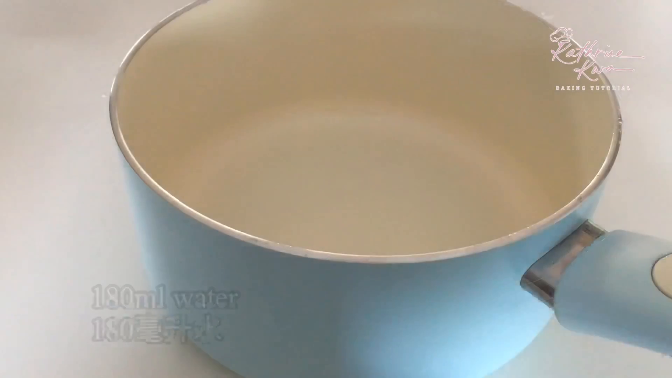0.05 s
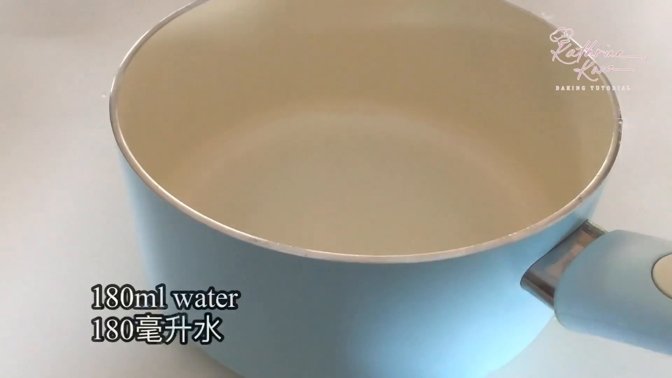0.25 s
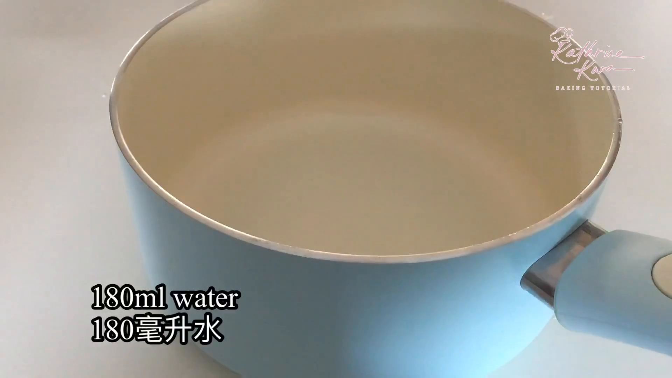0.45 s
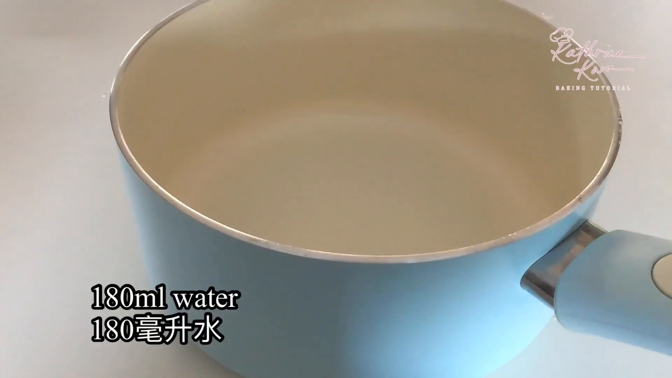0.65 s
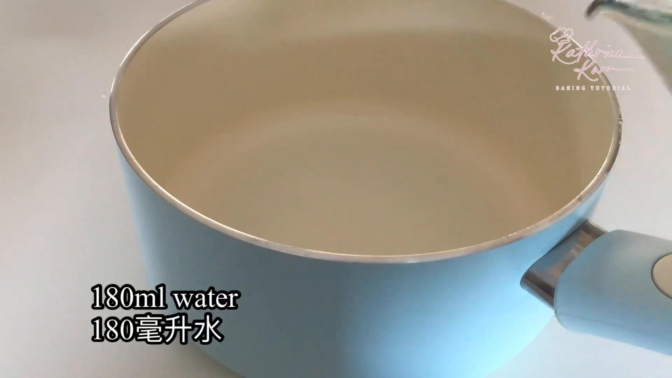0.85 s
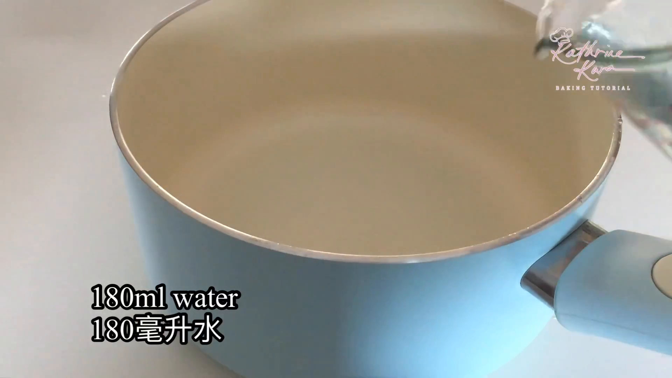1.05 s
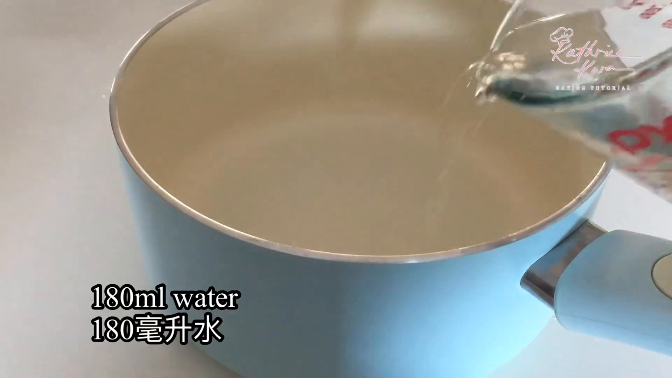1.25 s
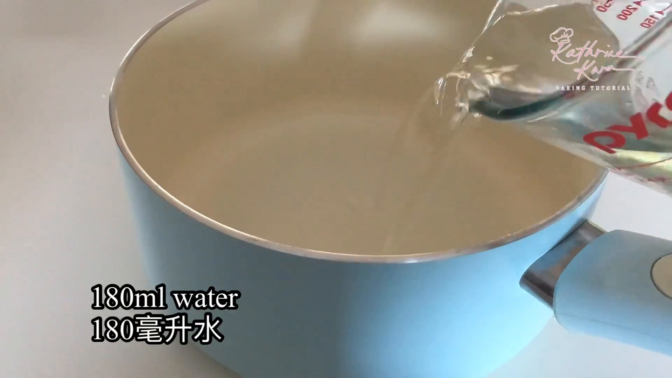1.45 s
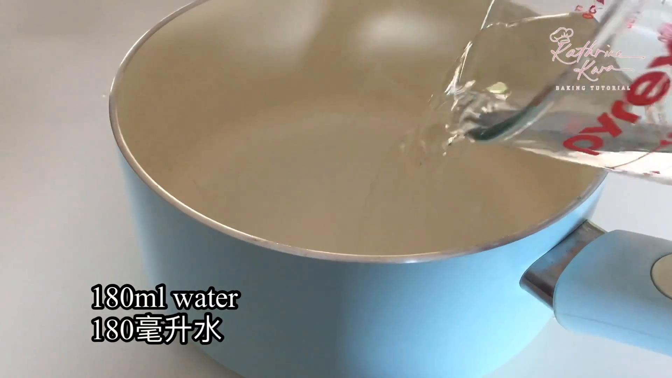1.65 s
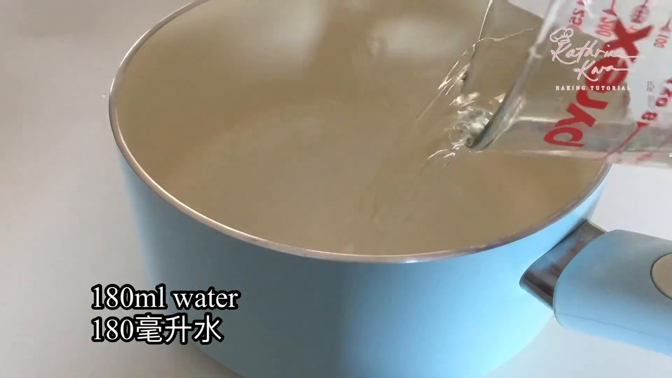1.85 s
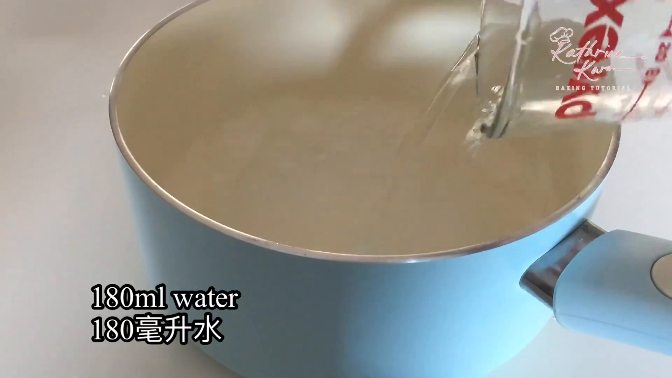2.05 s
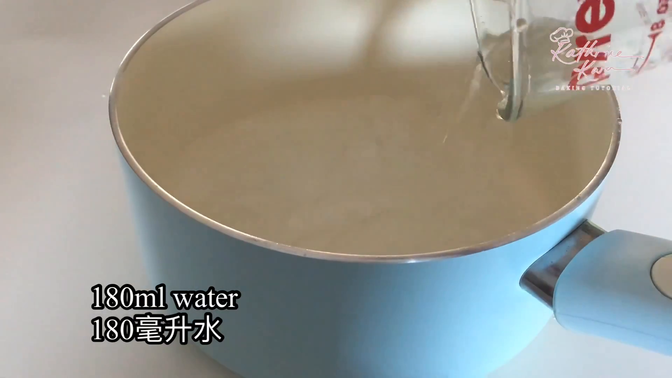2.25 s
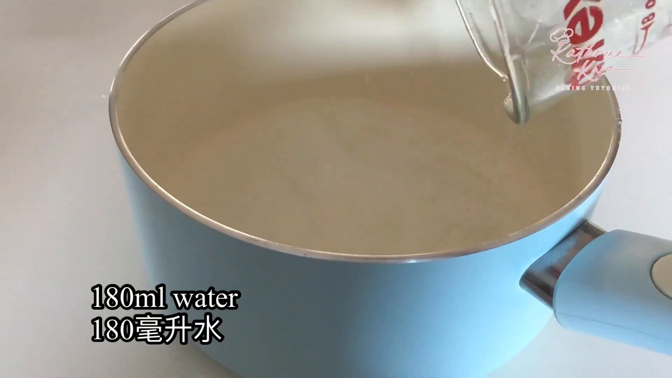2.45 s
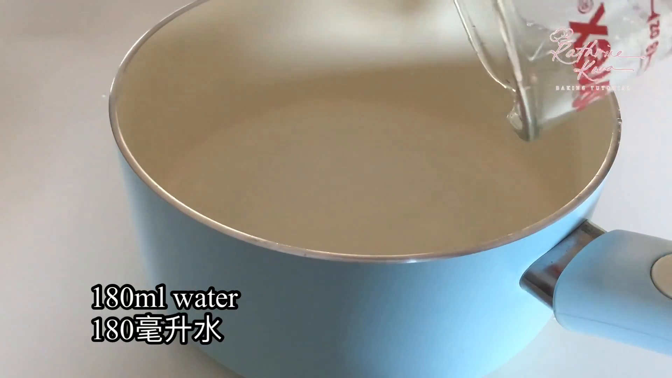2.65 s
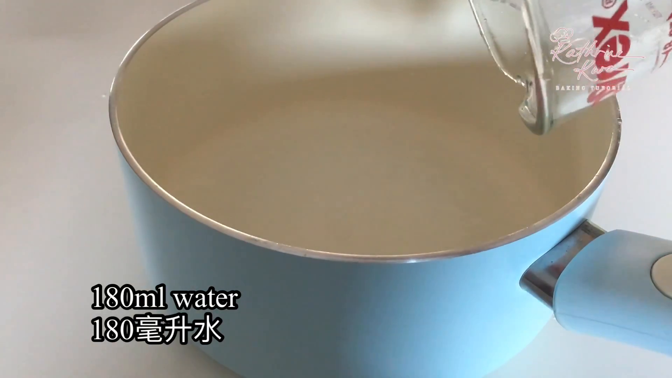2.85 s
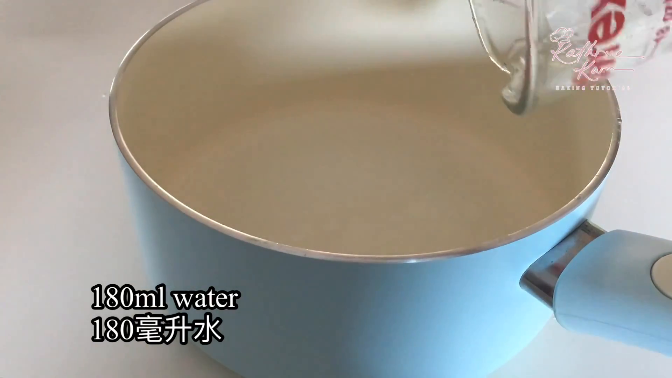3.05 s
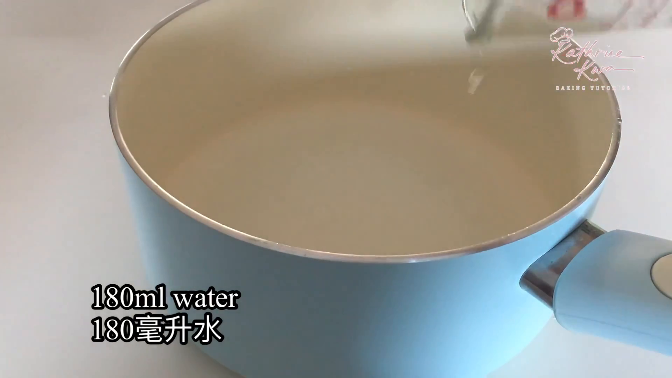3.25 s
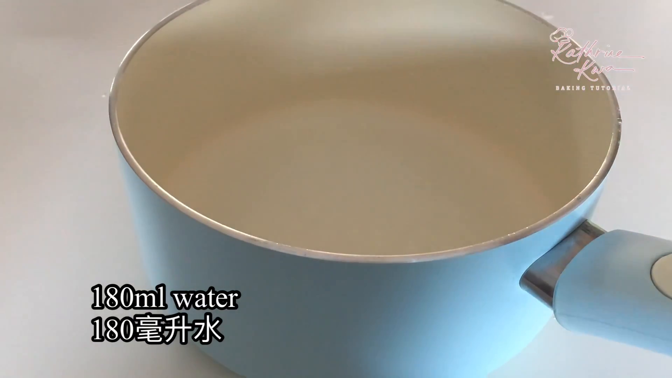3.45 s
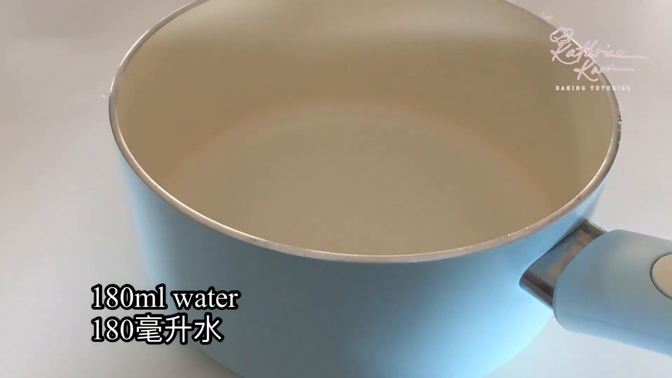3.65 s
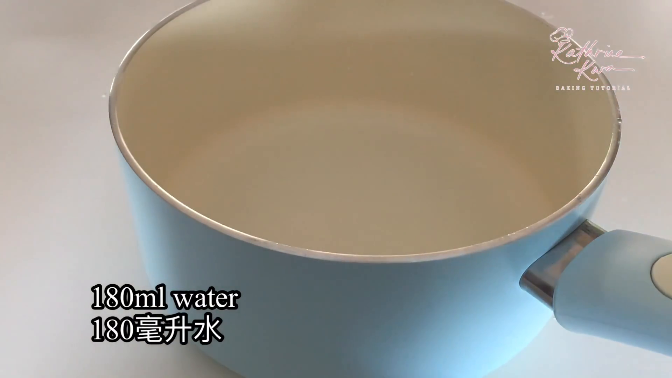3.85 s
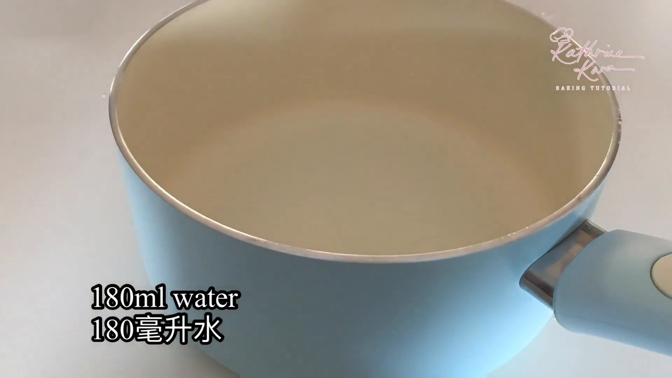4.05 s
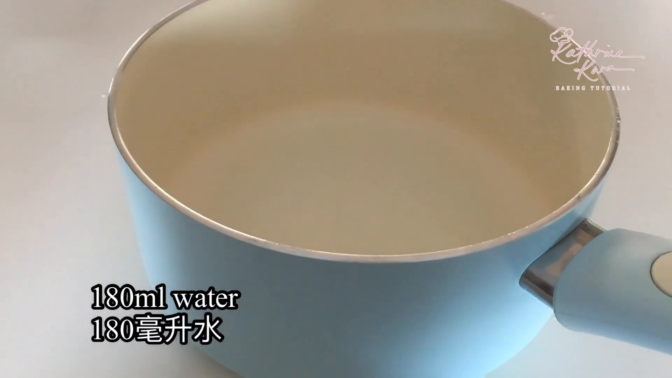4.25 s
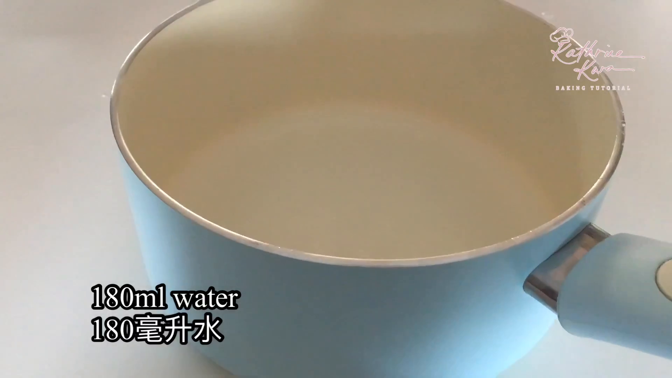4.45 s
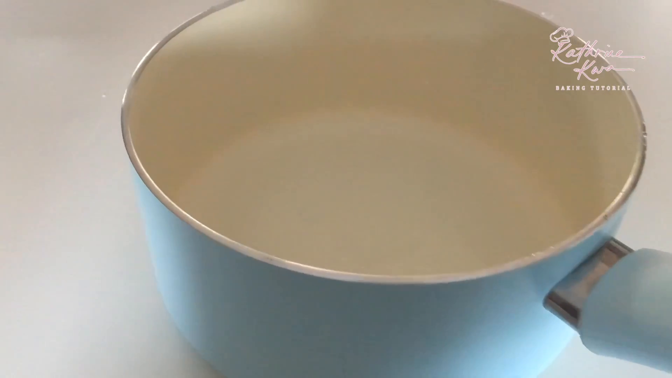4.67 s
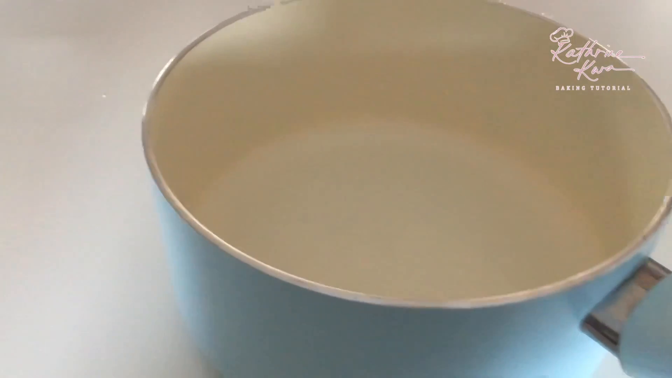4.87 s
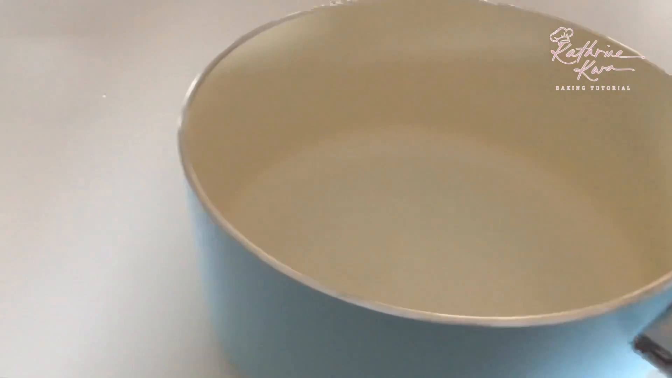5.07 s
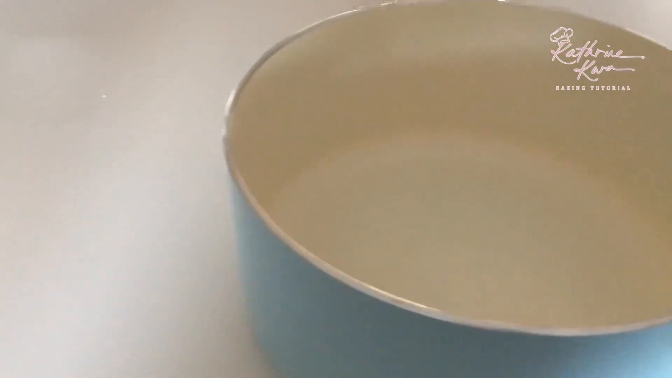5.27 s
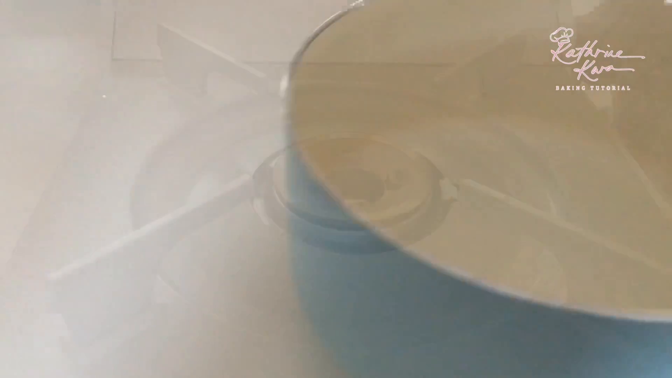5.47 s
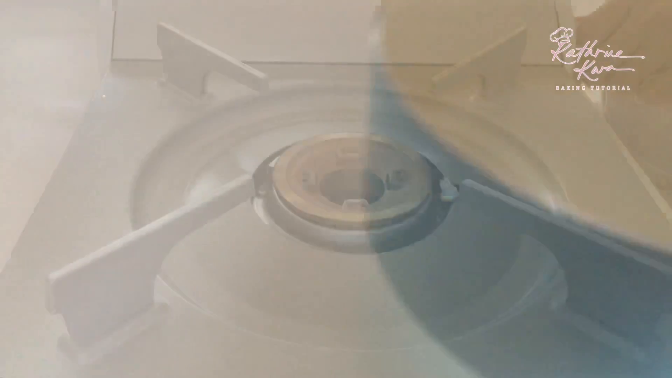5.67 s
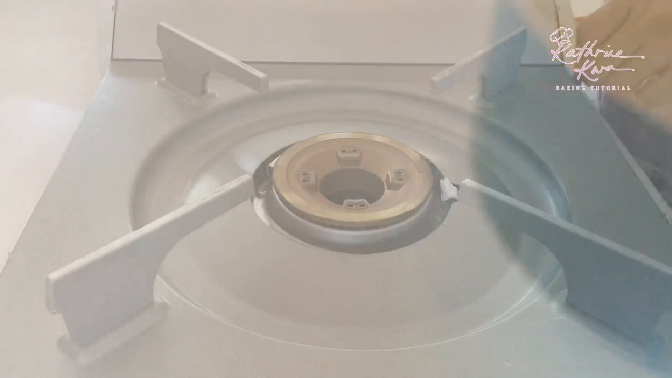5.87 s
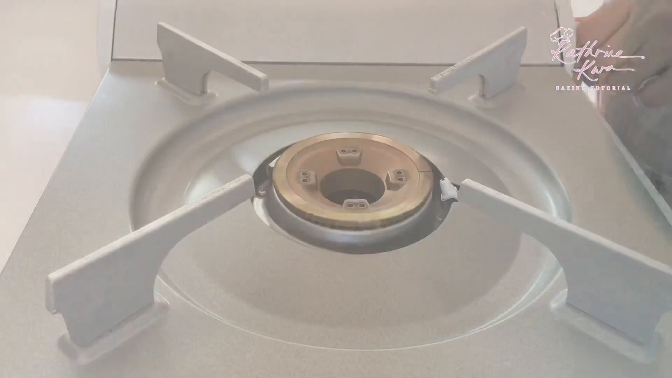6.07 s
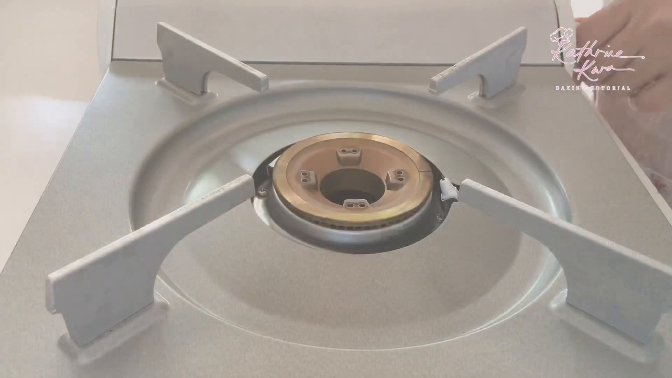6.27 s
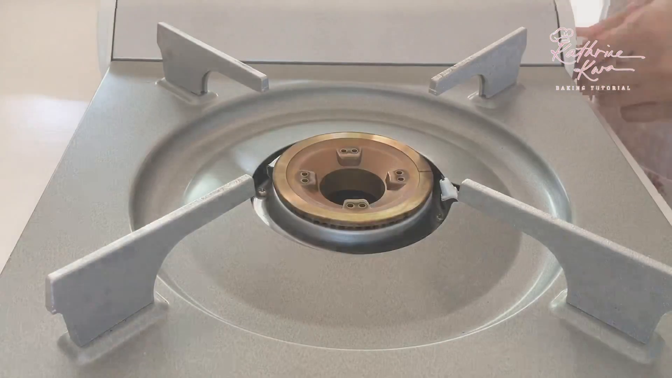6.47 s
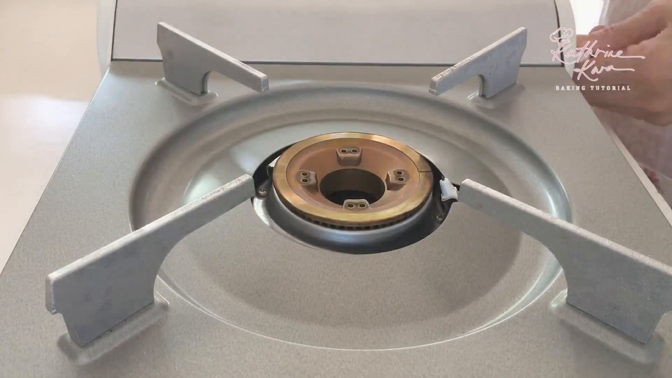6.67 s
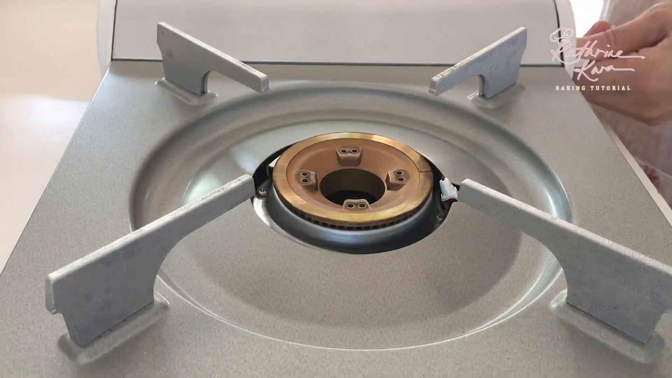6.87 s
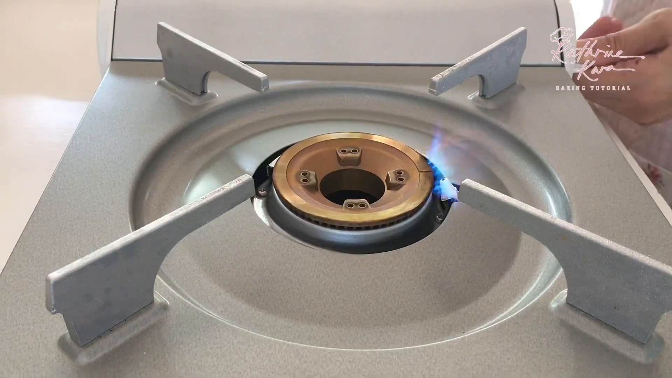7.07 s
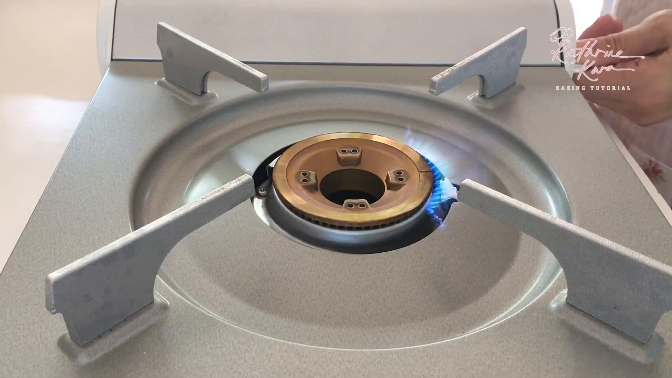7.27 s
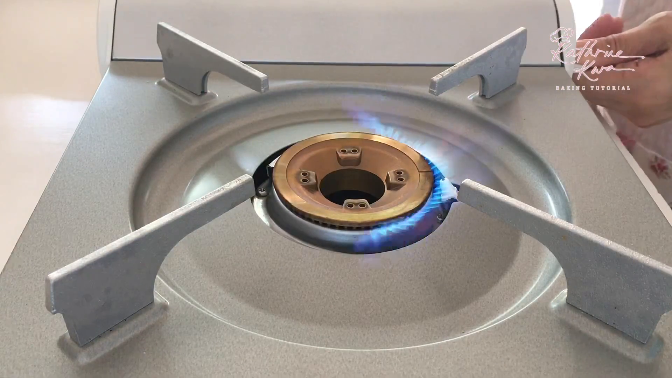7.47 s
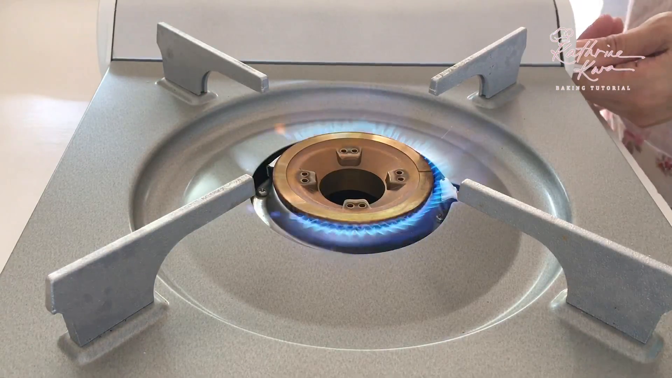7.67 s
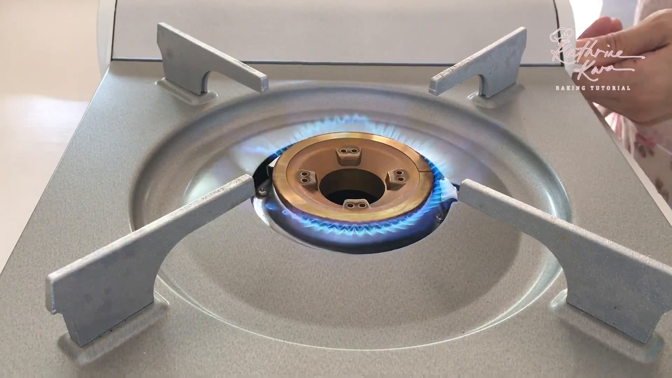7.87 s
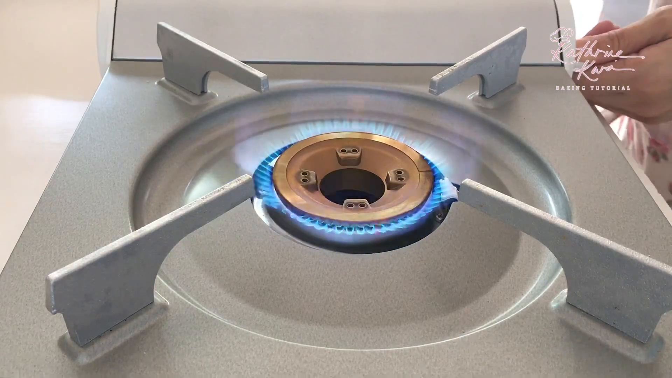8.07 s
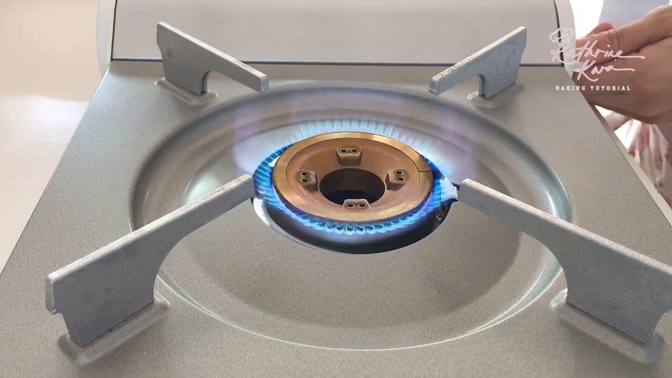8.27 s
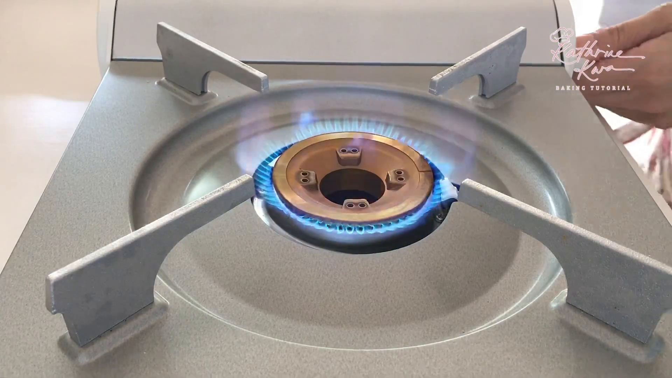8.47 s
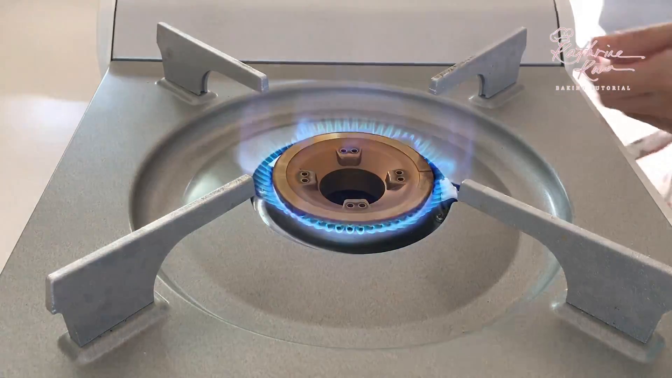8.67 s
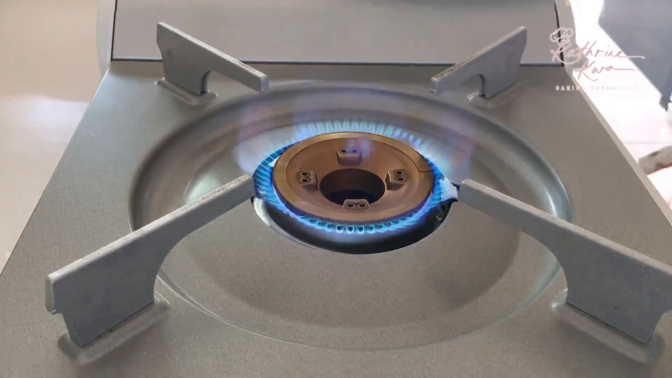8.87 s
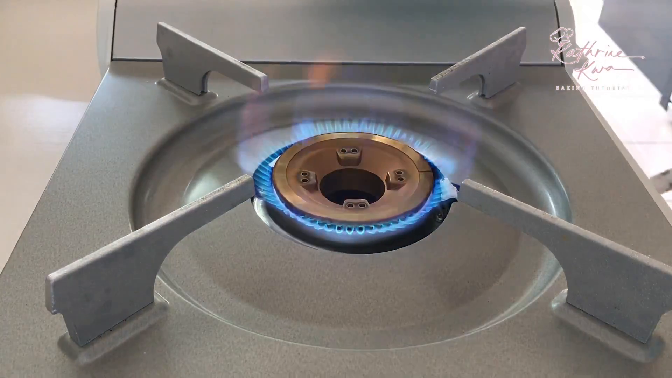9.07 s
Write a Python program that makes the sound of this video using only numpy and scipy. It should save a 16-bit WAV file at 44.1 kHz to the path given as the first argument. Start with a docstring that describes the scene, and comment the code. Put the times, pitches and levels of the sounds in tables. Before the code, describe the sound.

Faint handling squeaks over low room hum, then one dull, briefly ringing knock of glass on a pan. Water patters and gurgles in for under a second, leaving tiny high drips. Two pushes follow: a resonant scrape and a smoother hissing slide. Finally a knob turns, thin gas hiss begins, the igniter cracks loudly once, and a burner burns with soft low puffs. Close-miked, lightly reverberant kitchen.

```python
"""A quiet, humming kitchen: faint squeaks, then a glass jug knocks on a saucepan, and the pan's modes ring.
Water pours in as a swarm of ringing bubbles with a fine splash, and the jug drips dry.
The pan is pushed twice over the counter: a rubbing, ringing scrape, then a smooth, hissing glide.
A hand turns a stove's knob: gas hisses through the resonant burner tube and the piezo igniter snaps once.
The flame spreads round the burner as fluttering noise, with flares, fine crackle and soft pops of gas."""
import sys
import numpy as np
from scipy import signal
from scipy.fft import rfft, irfft, next_fast_len
from scipy.io import wavfile
from scipy.ndimage import uniform_filter1d, map_coordinates

SR = 44100
rng = np.random.default_rng(int(sys.argv[2]) if len(sys.argv) > 2 else 0)


def bounce(signal):
    """Save signal as a 16-bit WAV file at the path given by the first command-line argument."""
    frames = np.transpose(np.atleast_2d(signal))
    limited = np.clip(frames, -1, 1)
    pcm = np.round(limited * 32767).astype(np.int16)
    wavfile.write(sys.argv[1], SR, pcm)


N = 402092

# Spectrum of the room noise. Each row: frequency in Hz, relative density in dB per Hz.
AIR_SPECTRUM = [(15, -54), (25, -15.5), (87, -2.5), (130, -9), (161, -4), (223, -10), (363, -10),
                (503, -20), (560, -18), (796, -22), (2160, -28.5), (2990, -36), (3340, -36), (4140, -36),
                (16000, -53)]
# Partials of an appliance's hum. Each row: frequency in Hz, relative level in dB.
HUM_PARTIALS = [(102.3, -53.5), (161.5, -53.5), (199.2, -58), (355.3, -65.5), (538.3, -66), (570.6, -64)]
# Reverberation of the kitchen. Each row: frequency in Hz, time to decay by 60 dB in seconds.
ROOM_DECAY = [(100, 0.12), (400, 0.65), (1000, 0.9), (2000, 0.73), (3500, 0.58), (5500, 0.68), (9000, 0.55),
              (15000, 0.55)]
# Light knocks and scuffs of handling, then the knob's clicks.
# Each row: start in seconds, level in dB, centre frequency in Hz, time to decay by 60 dB in seconds.
HANDLING_TAPS = [(.42, -65, 2200, 1.0), (2.95, -57.5, 1490, 0.45), (4.01, -63, 1200, 0.54),
                 (5.146, -46.5, 1430, 0.12), (6.333, -42.5, 3280, .06), (6.563, -44, 1460, 0.088),
                 (6.981, -39, 4930, .008)]
# Faint squeaks from handling, then the valve's whistle.
# Each row: start in seconds, length in seconds, frequency in Hz, level in dB.
HANDLING_SQUEAKS = [(0.329, 0.17, 3550, -72), (0.495, 0.24, 3250, -73), (0.744, 0.21, 3300, -69.5),
                    (0.874, 0.28, 2785, -71.5), (1.018, 0.18, 3370, -71), (6.58, 0.2, 3210, -64.5),
                    (6.598, 0.12, 3720, -67), (6.612, 0.047, 6000, -58.5), (6.662, 0.028, 6100, -60)]
# Resonances of the pan's base. Each row: frequency in Hz, width in Hz, relative level in dB.
BASE_RESONANCES = [(812, 36, 0), (1360, 34, -3.5), (1680, 110, -6), (1960, 47, -2), (2410, 58, -3.5),
                   (3230, 160, -11.5), (4280, 100, -8.5), (5480, 82, -11.5), (6380, 56, -13),
                   (7020, 130, -12), (8030, 39, -14), (8670, 51, -14), (8950, 65, -18), (9660, 79, -21)]
# Spectrum of the smooth glide. Each row: frequency in Hz, relative density in dB per Hz.
GLIDE_SPECTRUM = [(470, -36), (800, -13), (990, 2.5), (1300, -5), (1680, -0.5), (2100, -5.5), (2320, -0.5),
                  (2500, -7.5), (3930, -6.5), (8030, -8.5), (8770, -8), (13800, -20.5), (16000, -28)]
# The loudest drops, large and low in the pour, small and high as the jug drips dry.
# Each row: start in seconds, level in dB, nominal bubble frequency in Hz.
LOUD_DROPS = [(1.6595, -28.5, 6460), (1.669, -35, 12000), (1.6801, -25.5, 3550), (1.695, -35, 5300),
              (1.805, -30, 6330), (1.831, -34, 2300), (1.8472, -26, 3080), (1.8524, -31.5, 2020),
              (1.8978, -30.5, 2360), (1.948, -37, 2060), (2.0337, -29, 3370), (2.0502, -27, 4230),
              (2.0534, -30.5, 2310), (2.074, -25, 1430), (2.1098, -31, 6600), (2.175, -26.5, 5540),
              (2.2489, -24.5, 6250), (2.2932, -27.5, 3460), (2.351, -36, 1420), (2.4587, -35, 2170),
              (2.745, -33.5, 8950), (2.795, -42.5, 7270), (2.849, -41.5, 8040), (2.987, -43, 14400),
              (3.0962, -43, 13200), (3.189, -45, 10500), (3.2665, -43, 6610), (3.3167, -42.5, 9540),
              (3.5152, -45.5, 6300), (3.6896, -40, 13000)]
# Stray droplets as the stream forms and breaks up. Each row: start in seconds, end in seconds, mean level in dB.
STRAY_DROPLETS = [(1.499, 1.851, -44.5), (2.68, 3.0, -45.5)]
# Modes of the knocked pan. Each row: frequency in Hz, level in dB, time to decay by 60 dB in seconds.
PAN_MODES = [(108, -23, 0.16), (206, -27.5, 0.35), (246, -17, 0.12), (300, -14, 0.081),
             (361.5, -13.5, 0.13), (599, -20, 0.093), (639, -30, 0.23), (706, -26, 0.17), (950, -30, 0.19),
             (982, -25, 0.086), (1206, -33, 0.16), (1367, -24, 0.11), (1415, -20, 0.12), (2000, -35, 0.2),
             (2173, -22, 0.051), (2440, -31, 0.17), (3230, -25.5, 0.093), (3420, -32, 0.079),
             (3725, -27, 0.11), (4050, -36, 0.12), (4700, -39, 0.078), (6170, -29, 0.077),
             (6880, -23.5, 0.053), (8000, -44, .13), (8500, -43, 0.16), (9400, -35, 0.14),
             (10600, -40, 0.072), (11400, -36, 0.066)]
# Spectrum of the jug's blow. Each row: frequency in Hz, relative density in dB per Hz.
KNOCK_SPECTRUM = [(24, -49), (40, -33), (290, -7), (363, -23), (491, -20), (715, 0.5), (1090, -27),
                  (1370, -14.5), (2980, -26), (3650, -22), (5580, -34.5), (7000, -23.5), (16000, -44.5)]
# Resonances of the burner tube. Each row: frequency in Hz, width in Hz, relative level in dB.
TUBE_RESONANCES = [(3174, 79, 8.5), (3540, 200, -8), (3830, 52, 8), (4530, 220, 1.5), (5800, 420, -4),
                   (6770, 187, 1), (7970, 390, 1), (8760, 450, -7.5), (8650, 120, -14.5), (9200, 540, -2),
                   (13400, 290, -7.5), (14120, 400, -8)]
# Spectrum of the fluttering flame. Each row: frequency in Hz, relative density in dB per Hz.
FLAME_SPECTRUM = [(25, -32), (54, -4.5), (108, -1), (180, -3), (330, -7.5), (490, -12), (680, -28.5),
                  (1200, -27.5), (2000, -44), (4000, -59)]
# The loudest pockets of gas. Each row: start in seconds, level in dB, low puff in dB relative to that level.
GAS_POPS = [(7.458, -35.5, -4), (7.746, -42, -5), (7.842, -37.5, -8), (7.937, -40, -12), (7.984, -42, -6),
            (8.323, -44, -2), (8.341, -41.5, 10), (8.68, -45, 12), (8.713, -35.5, -12), (8.791, -46, -1),
            (8.865, -40.5, 4), (8.94, -44, -3), (9.07, -41, 11), (9.106, -44, -6)]
# Flares of the flame. Each row: centre in seconds, time from centre to 1/e in seconds,
# added burn level in dB, deep whoomp in dB.
FLAME_FLARES = [(7.485, .07, -47.5, -51), (7.854, .1, -50.5, -58), (8.34, 0.015, -44, -46),
                (8.47, .025, -47, -40), (8.67, 0.061, -45, -43.5), (8.948, 0.019, -47, -36),
                (9.09, 0.074, -47, -47)]
# Spectrum of the igniter's crack and blow. Each row: frequency in Hz, relative density in dB per Hz.
SNAP_SPECTRUM = [(30, -13), (70, -4), (160, -2.5), (300, -9), (450, -11), (900, -8), (1300, -9), (1700, -5),
                 (2400, -5), (2900, -8), (3500, -6), (4600, -11), (5700, -9), (9500, -16), (15500, -26)]
# Modes of the stove's sheet metal.
# Each row: frequency in Hz, relative level in dB, time to decay by 60 dB in seconds.
STOVE_MODES = [(96, -26, .13), (528, -32, .3), (700, -25, .08), (845, -24, .13), (898, -19, .1),
               (955, -22, .12), (1061, -35, .4), (1195, -24, .1), (1390, -25, .08), (1694, -19, .11),
               (1872, -22, .09), (1977, -19, .09), (2228, -20, .08), (2560, -19, .07), (3242, -13.5, .055),
               (3340, -21, .055), (3486, -20, .055), (3615, -14, .055), (3903, -21, .07), (4410, -26, .08),
               (5230, -25, .07), (5890, -27.5, .1), (6575, -26, .09), (8586, -30, .09)]

# Names in _S are seconds, in _DB decibels, in _HZ hertz.
AIR_DB = -52  # steady room noise
LIFT_START_S, LIFT_STOP_S, LIFT_DB, LIFT_SAG_DB = 2.95, 6.9, -58, 8  # for a while the room noise is louder
EDGE_S = 0.014  # a movement starts and stops this quickly
SCRAPE_START_S, SCRAPE_PEAK_S, SCRAPE_STOP_S = 4.51, 4.864, 5.18  # first push: the base rubs and rings
SCRAPE_DB, SCRAPE_RISE_DB, SCRAPE_FALL_DB = -48.5, 15.5, 7
GLIDE_START_S, GLIDE_PEAK_S, GLIDE_STOP_S = 5.284, 5.68, 6.054  # second push: the pan glides smoothly
GLIDE_DB, GLIDE_RISE_DB, GLIDE_FALL_DB = -48, 9.5, 18
POUR_START_S, POUR_FULL_S, POUR_EASE_S, POUR_STOP_S = 1.78, 2.0, 2.27, 2.48  # the jug tips, pours, is raised
POUR_RISE_DB, POUR_FALL_DB = 10, 14.5  # flow gained and lost on the way
SWARM_DB, SPLASH_DB = -50.5, -57.5  # at full flow
LOWEST_HZ, LOWEST_FOLLOWS = 980, 0.593  # lowest bubble at full flow; exponent by which more flow lowers it
CLUMP_DB = 1.8  # the stream lands in clumps
BUBBLE_CYCLES, BUBBLE_RISE = 56, 0.076  # a drop's bubble: 60 dB decay in cycles, share of pitch gained
SHED_S = .02  # time in which a drop's bubble sheds smaller ones
SPRAY_HZ = 10500  # typical bubble of a stray droplet
VALVE_S, VALVE_OPENING_S, GAS_DB, GAS_RISE_DB = 6.33, 0.32, -65.5, 6  # gas flow grows as the knob turns
PILOT_STOP_S, PILOT_DB = 7.52, -68  # a thin high hiss of lighting gas, until the burner has caught
LIGHT_S, SPREAD_S, FLAME_DB, SPREAD_DB = 7.22, 0.18, -46, 8  # the flame catches and runs round the burner
SMALL_POP_DB = -47  # lesser pops come at random
TOP_HZ = 15900  # upper limit of the finished sound


def amp(db):
    """A level in decibels is the logarithm of an amplitude ratio."""
    return 10 ** (np.asarray(db) / 20)


def unit(x):
    """Dividing by the root mean square normalises a signal to rms 1."""
    return x / np.sqrt(np.mean(x ** 2) + 1e-20)


def along(points, hz):
    """Interpolation between (Hz, value) points on a logarithmic frequency axis."""
    f, v = np.transpose(points)
    return np.interp(np.log(hz + 1), np.log(f + 1), v)


def level(rows):
    """A gain envelope, linear in dB between (s, dB) rows and practically silent outside them."""
    s, db = np.transpose(rows)
    return amp(np.interp(np.arange(N) / SR, s, db, left=-140, right=-140))


def wobble(rate):
    """Band-limited random fluctuation: a smooth curve through rate random knots a second."""
    knots = rng.standard_normal(int(N * rate / SR) + 4)
    steps = np.arange(0, len(knots) - 1, .125)
    return np.interp(np.arange(N) * rate / SR, steps, map_coordinates(knots, [steps]))


def filtered(x, response):
    """Linear filtering: the spectrum of x is multiplied by a response of frequency."""
    m = next_fast_len(len(x) + SR // 2)
    return irfft(rfft(x, m) * response(np.fft.rfftfreq(m, 1 / SR)), m)[:len(x)]


def noise(colour, size=N):
    """Coloured noise: white noise of random phase shaped by a (Hz, dB) spectrum, at rms 1."""
    return unit(filtered(rng.standard_normal(size), lambda f: amp(along(colour, f))))


def resonate(x, peaks):
    """Parallel second-order resonances (Hz, width, dB), of alternating sign, excited by x; at rms 1."""
    def response(f):
        total = 0
        for k, (centre, width, db) in enumerate(peaks):
            damping = 1j * f * width
            total = total + (-1) ** k * amp(db) * damping / (centre * centre - f * f + damping)
        return total
    return unit(filtered(x, response))


def fade(t, t60):
    """Exponential decay: the level falls by 60 dB in t60."""
    return np.exp(-np.log(1000) * t / t60)


def ring(modes, t):
    """Modal superposition: a struck body sounds as decaying sines (Hz, dB, t60) of random phase."""
    return sum(amp(db) * fade(t, t60) * np.sin(2 * np.pi * (hz * t + rng.random())) for hz, db, t60 in modes)


def add(track, s, sound):
    """Linear superposition of a sound on a track from time s."""
    part = track[round(s * SR):][:len(sound)]
    part += sound[:len(part)]


def push(t, width):
    """An acoustic pulse: one quick swing of air pressure, with no net flow."""
    u = t / width
    return 2 * u * (2 - u) * np.exp(-u)


def stroke(start, full, ease, stop, rise_db, fall_db):
    """Gain of one movement: it grows by rise_db, holds at 1 from full to ease, sinks by fall_db and stops."""
    return level([(start - EDGE_S, -rise_db - 40), (start, -rise_db), (full, 0),
                  (ease, 0), (stop, -fall_db), (stop + EDGE_S, -fall_db - 40)])


def opening(start, rise_s, rise_db):
    """Gain of a sustained source: it starts, grows by rise_db and then stays."""
    return stroke(start, start + rise_s, N / SR, N / SR, rise_db, 0)


def patchy(x, depth_db, size):
    """Random spectral modulation: nearby frequencies wax and wane together, in patches of size frames."""
    z = signal.stft(x, nperseg=512)[2]
    across_hz = uniform_filter1d(rng.standard_normal(z.shape), 3, 0)
    field = uniform_filter1d(across_hz, size, 1)
    return unit(signal.istft(z * amp(depth_db * unit(field)), nperseg=512)[1][:N])


def room(x):
    """Diffuse reverberation: x convolved with noise whose every frequency dies at its own speed."""
    hz, t, z = signal.stft(rng.standard_normal(SR), SR, nperseg=256)
    tail = signal.istft(z * fade(t, along(ROOM_DECAY, hz)[:, None]), SR, nperseg=256)[1]
    tail = tail * (1 - np.exp(-(np.arange(len(tail)) / SR / 0.005) ** 2))  # the walls take a moment to answer
    return signal.fftconvolve(x, tail / np.linalg.norm(tail))[:len(x)]


def in_room(x, wet_db):
    """Direct and reverberant sound add: x with the kitchen's answer."""
    return x + amp(wet_db) * room(x)


def strike(s, source, wet_db, count=4):
    """Directivity: a struck body radiates one version to the microphone and others to the walls."""
    out = np.zeros(N)
    direct = source()
    reverberant = sum(room(source()) for _ in range(count)) / np.sqrt(count)
    add(out, s, direct + amp(wet_db) * reverberant)
    return out


def kitchen():
    """Stationary background: low room noise and an appliance hum whose partials drift in level and phase."""
    t = np.arange(N) / SR
    hum = unit(sum(amp(db + 2.1 * wobble(5)) * np.sin(2 * np.pi * hz * t + 1.47 * wobble(9))
                   for hz, db in HUM_PARTIALS))
    lift = stroke(LIFT_START_S, LIFT_START_S, LIFT_START_S, LIFT_STOP_S, 0, LIFT_SAG_DB)
    return (amp(AIR_DB) + amp(LIFT_DB) * lift) * (noise(AIR_SPECTRUM) + amp(-3) * hum)


def handling():
    """Impact and friction: decaying noise taps and clicks, and narrow-band squeaks that swell and stop."""
    out, t = np.zeros(N), np.arange(SR) / SR
    for s, db, hz, t60 in HANDLING_TAPS:
        colour = [(hz / 6, -25), (hz / 2, -4), (hz, 0), (hz * 2, -9), (hz * 4, -22), (hz * 8, -35)]
        onset = 1 - np.exp(-t / (0.018 * t60))
        add(out, s, amp(db) * noise(colour, size=len(t)) * fade(t, t60) * onset)
    for s, length, hz, db in HANDLING_SQUEAKS:
        swell = np.sqrt(np.hanning(int(length * SR)))
        colour = [(hz * .9, -40), (hz * .99, 0), (hz * 1.01, 0), (hz * 1.1, -40), (hz * 2, -90)]
        add(out, s, amp(db) * swell * noise(colour, size=len(swell)))
    return out


def slide():
    """Friction: tiny slips first excite the pan's base, then merge into a hiss; each push swells and sinks."""
    slips = rng.standard_normal(N) * amp(3.2 * wobble(120) + 2.8 * wobble(25))
    rub = noise([(80, -12), (330, 11), (600, -1), (1500, -2), (2400, -8), (4000, -9), (10000, -16.5), (15000, -28)])
    scrape = patchy(resonate(slips, BASE_RESONANCES) + amp(-1.5) * rub, depth_db=3.5, size=7)
    glide = patchy(noise(GLIDE_SPECTRUM), depth_db=2.5, size=5)
    first = stroke(SCRAPE_START_S, SCRAPE_PEAK_S, SCRAPE_PEAK_S, SCRAPE_STOP_S, SCRAPE_RISE_DB, SCRAPE_FALL_DB)
    second = stroke(GLIDE_START_S, GLIDE_PEAK_S, GLIDE_PEAK_S, GLIDE_STOP_S, GLIDE_RISE_DB, GLIDE_FALL_DB)
    return amp(SCRAPE_DB) * first * scrape + amp(GLIDE_DB) * second * glide


def bubble(hz, cycles, rise):
    """Bubble resonance: trapped air rings and rises in pitch as it nears the surface."""
    t = np.arange(SR // 16) / SR
    life = cycles / hz
    pitch = hz * (1 + rise * np.minimum(t / life, 1))
    onset = 1 - np.exp(-t * hz / 1.8)
    return np.sin(2 * np.pi * np.cumsum(pitch) / SR) * fade(t, life) * onset


def drops():
    """Impact and entrainment: each drop slaps the water and traps a bubble, which sheds smaller ones."""
    out, t = np.zeros(N), np.arange(SR // 16) / SR
    spray = []
    for start, stop, db in STRAY_DROPLETS:
        for when, size, pitch in rng.random((8, 3)):
            spray.append((start + (stop - start) * when, db + 10 * (size - .5), SPRAY_HZ * 2 ** (pitch - .5)))
    for s, db, hz in LOUD_DROPS + spray:
        # smaller drops slap brighter
        slap = noise([(hz / 4, -24), (hz * 0.52, -2), (hz * 1.6, -3), (hz * 4, -9)], size=len(t)) * fade(t, 0.019)
        main_bubble = bubble(hz * .985, cycles=BUBBLE_CYCLES, rise=BUBBLE_RISE)
        add(out, s, amp(db) * (main_bubble + amp(-15.5) * slap))
        for late, pitch in rng.random((6, 2)):
            shed = bubble(hz ** (1 - pitch) * 14000 ** pitch, cycles=71, rise=0.05)
            add(out, s + SHED_S * late ** 2, amp(db - 13.5) * shed)
    return out


def in_pan(x, echo_db, t60):
    """Multiple reflection: x plus quick, decaying echoes between the pan's walls."""
    t = np.arange(SR // 8) / SR
    echoes = rng.standard_normal(len(t)) * fade(t, t60) * (t > .001)
    return x + amp(echo_db) * signal.fftconvolve(x, echoes / np.linalg.norm(echoes))[:N]


def water():
    """Air entrainment: the flow drives a swarm of bubbles and a fine splash; with the drops they echo in the pan."""
    swarm, length = np.zeros(N), POUR_STOP_S - POUR_START_S
    flow = stroke(POUR_START_S, POUR_FULL_S, POUR_EASE_S, POUR_STOP_S, POUR_RISE_DB, POUR_FALL_DB)
    for when, size, pitch in rng.random((450, 3)):
        s = POUR_START_S + when * length
        lowest = LOWEST_HZ * flow[round(s * SR)] ** -LOWEST_FOLLOWS  # more flow traps larger, lower bubbles
        hz = lowest * (12000 / lowest) ** (pitch ** .8)
        add(swarm, s, amp(20 * size) * bubble(hz, cycles=52, rise=0.08))
    swarm = swarm / np.sqrt(np.sum(swarm ** 2) / SR / length)  # rms 1 over the pour
    spatter = noise([(900, -15), (1600, -1), (7000, 8), (15000, 0.5)]) * amp(9.2 * wobble(400))
    splash = patchy(spatter, depth_db=4, size=3)
    clumps = unit(amp(CLUMP_DB * wobble(34.99)))
    stream = flow * clumps * (amp(SWARM_DB) * swarm + amp(SPLASH_DB) * splash)
    trickle = stroke(2.48, 2.75, 2.7, 3.03, rise_db=7, fall_db=7)  # a thread of water trails the pour
    return in_pan(drops() + stream + amp(-66) * trickle * splash, echo_db=-5.5, t60=0.05)


def knock():
    """Impact excitation: a dull blow, a low push through the counter and the pan's ringing modes."""
    t = np.arange(SR) / SR
    blow = amp(-14.5) * noise(KNOCK_SPECTRUM, size=SR) * fade(t, .08)
    thump = amp(-30) * push(t, width=0.0024)
    return (blow + thump + ring(PAN_MODES, t)) * (1 - np.exp(-t / 0.0004))


def gas():
    """Jet noise: turbulence excites the burner tube's wavering resonances; a thinner jet hisses till it is lit."""
    turbulence = rng.standard_normal(N)
    tube = patchy(resonate(turbulence, TUBE_RESONANCES), depth_db=2, size=30)
    tube_flow = opening(VALVE_S, VALVE_OPENING_S, GAS_RISE_DB)
    pilot = noise([(2000, -19), (5000, 1), (9000, -3), (11000, -2.5), (14000, 1), (16000, -6.5)])
    pilot_flow = stroke(VALVE_S, LIGHT_S, LIGHT_S, PILOT_STOP_S, rise_db=8, fall_db=1)
    return amp(GAS_DB) * tube_flow * tube + amp(PILOT_DB) * pilot_flow * pilot


def igniter():
    """Impulsive excitation: a needle-sharp crack, then the sprung hammer thumps and rattles the stove's metal."""
    t = np.arange(SR) / SR
    u = t / .00009
    crack = 1.8 * (u - 1) * np.exp(-u)
    out = crack + amp(-14) * noise(SNAP_SPECTRUM, size=SR) * fade(t, .008)
    blow = amp(-9.0) * noise(SNAP_SPECTRUM, size=SR) * fade(t, 0.066)
    thump = amp(-19.5) * push(t, width=0.0016)
    rattle = amp(-2.0) * ring(STOVE_MODES, t)
    add(out, .0014, (blow + thump + rattle) * (1 - np.exp(-t / 0.00014)))
    return out


def flame():
    """Combustion noise: the flame spreads, flares, flutters and crackles; gas pockets pop with tick and puff."""
    pops, t = np.zeros(N), np.arange(SR // 16) / SR
    burning_s = LIGHT_S + SPREAD_S
    small = [(burning_s + when * (N / SR - burning_s), SMALL_POP_DB, 0) for when in rng.random(size=6)]
    for s, db, puff_db in GAS_POPS + small:
        tick = noise([(300, -8), (1000, 0), (2200, -2), (4000, -13), (15000, -28)], size=len(t)) * fade(t, .018)
        puff = amp(puff_db) * push(t, width=.0009)
        add(pops, s, amp(db) * (.6 * tick + .7 * push(t, width=.0002) - puff))
    flutter = unit(noise(FLAME_SPECTRUM) * amp(1.5 * wobble(30)))
    crackle_noise = noise([(300, -12), (1100, 0), (2200, -5), (5000, -28), (15000, -50)])
    crackle = unit(crackle_noise * amp(5 * wobble(300)))
    whoomp = noise([(30, -24), (60, -4), (120, 0), (200, -5), (400, -26), (1000, -60)])
    burn, deep = amp(FLAME_DB) * opening(LIGHT_S, SPREAD_S, SPREAD_DB), np.zeros(N)
    for s, half, db, deep_db in FLAME_FLARES:
        swell = np.exp(-((np.arange(N) / SR - s) / half) ** 2)
        burn = burn + amp(db) * swell
        deep = deep + amp(deep_db) * swell
    return pops + burn * (amp(0.5) * flutter + amp(-19) * crackle) + deep * whoomp


def scene():
    """Superposition of all sources at one microphone."""
    pan = strike(1.2745, knock, wet_db=-15.5) + in_room(water(), wet_db=-14) + slide()
    stove = strike(7.0044, igniter, wet_db=-13.0) + gas() + flame()
    return (pan + stove + in_room(handling(), wet_db=-4.5) + kitchen())[None]


def record(dry):
    """Band limiting and saturation: deep bass is cut, peaks round off near full scale, the top is cut."""
    thin = signal.sosfilt(signal.butter(3, 36, "high", fs=SR, output="sos"), dry[0])
    rounded = thin / (1 + np.abs(thin / .95) ** 6) ** (1 / 6)
    return filtered(rounded, lambda hz: 1 / (1 + (hz / TOP_HZ) ** 120))[None]


dry = scene()
out = record(dry)
bounce(out)
```